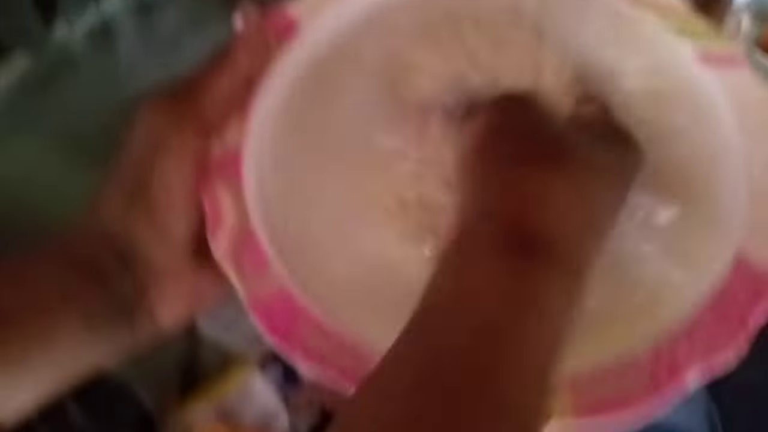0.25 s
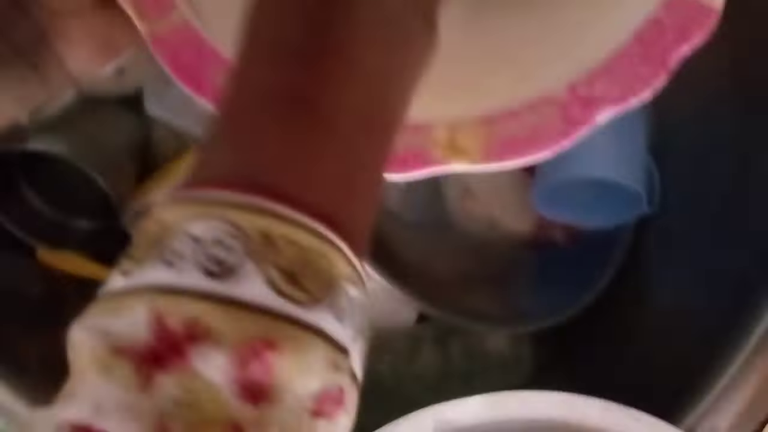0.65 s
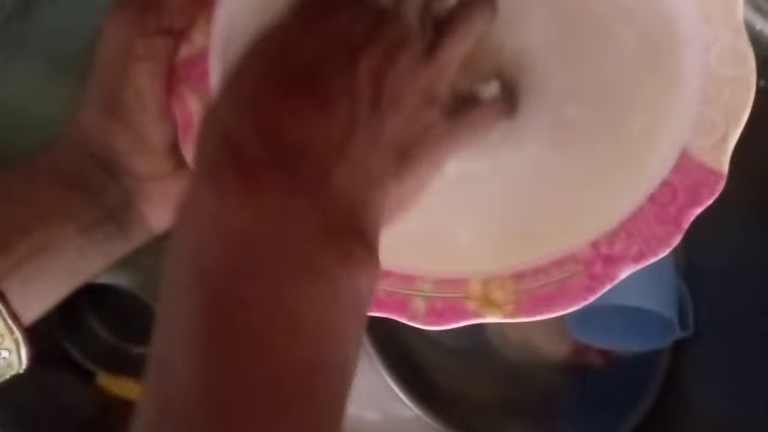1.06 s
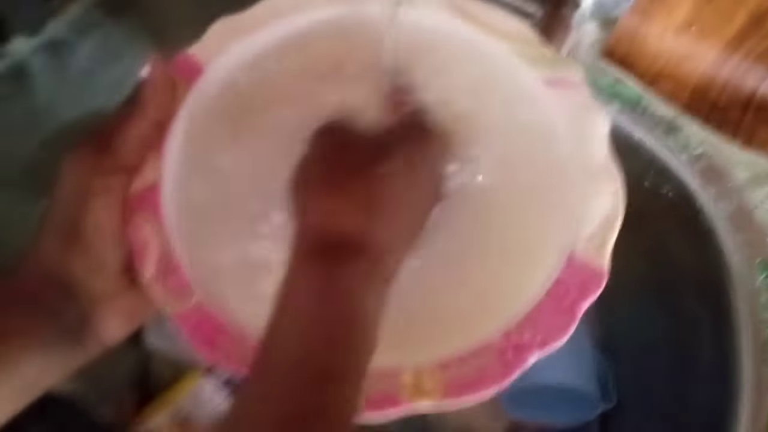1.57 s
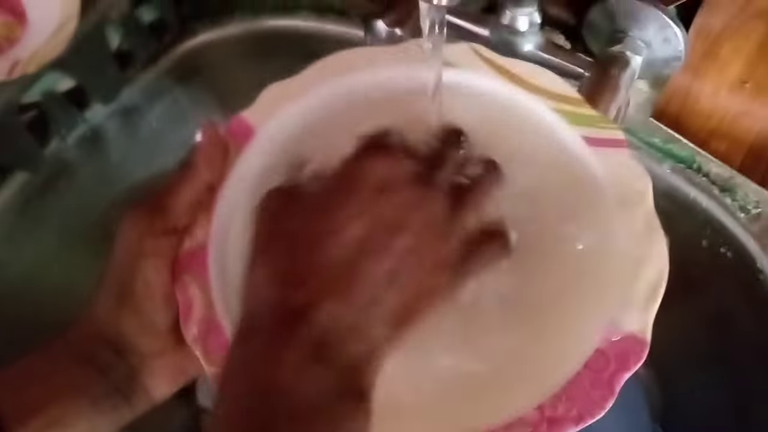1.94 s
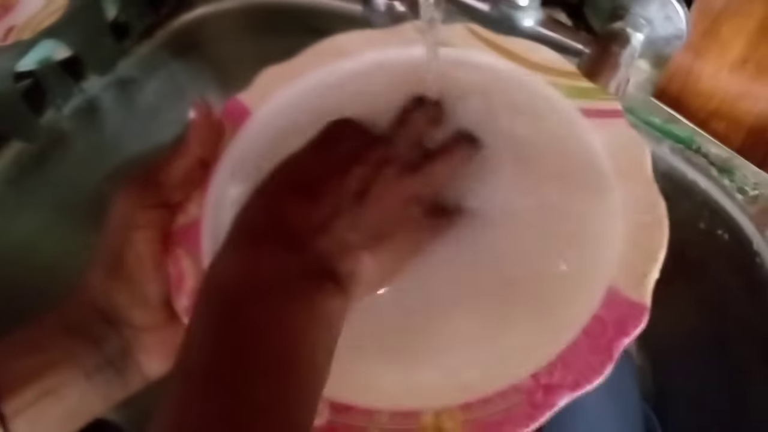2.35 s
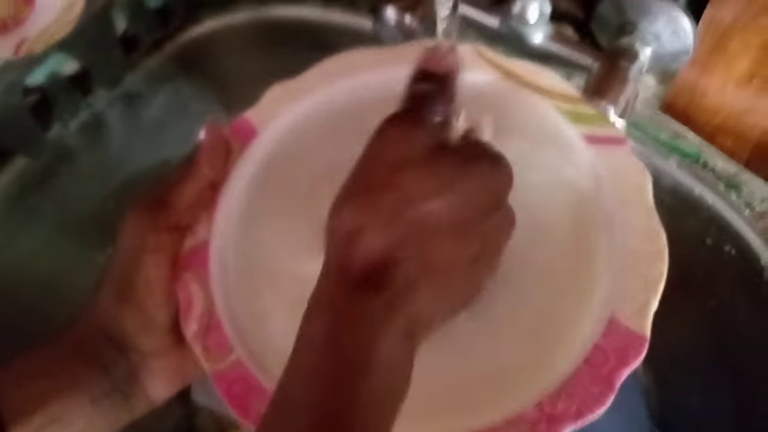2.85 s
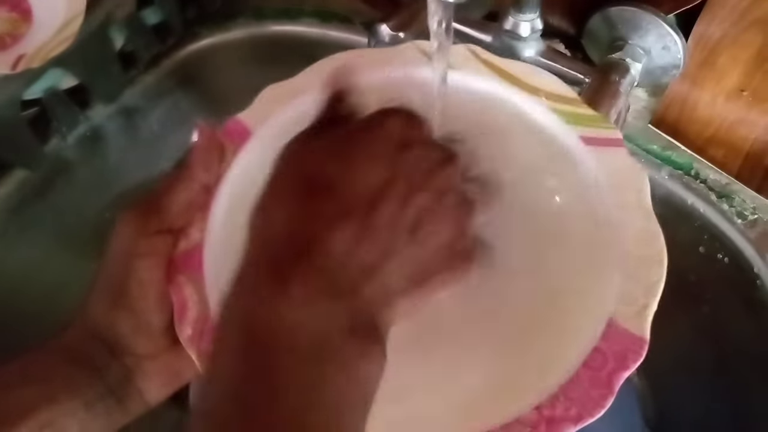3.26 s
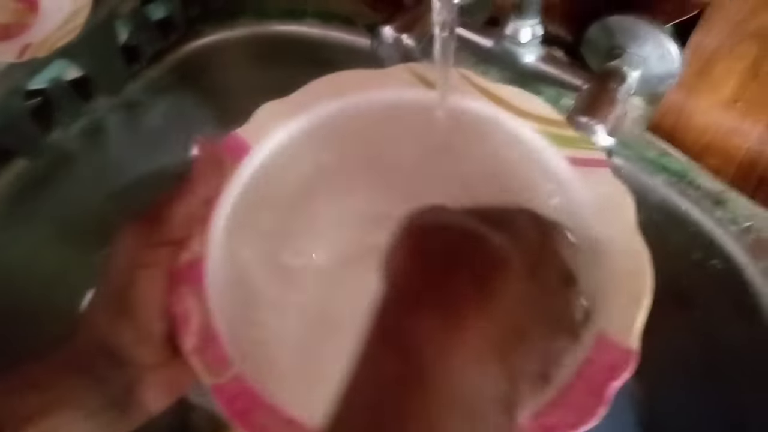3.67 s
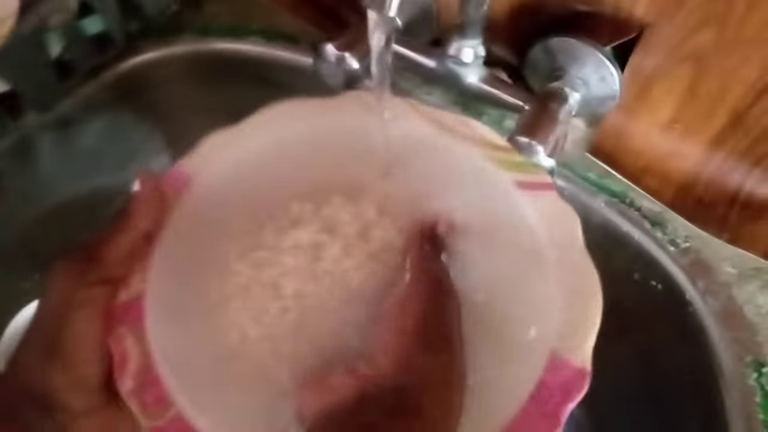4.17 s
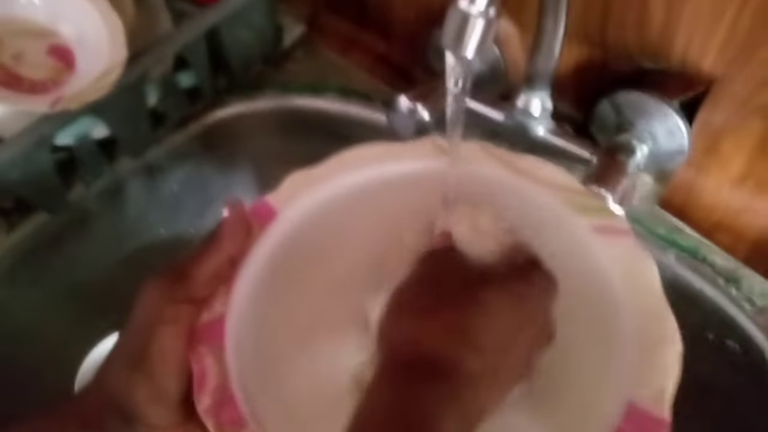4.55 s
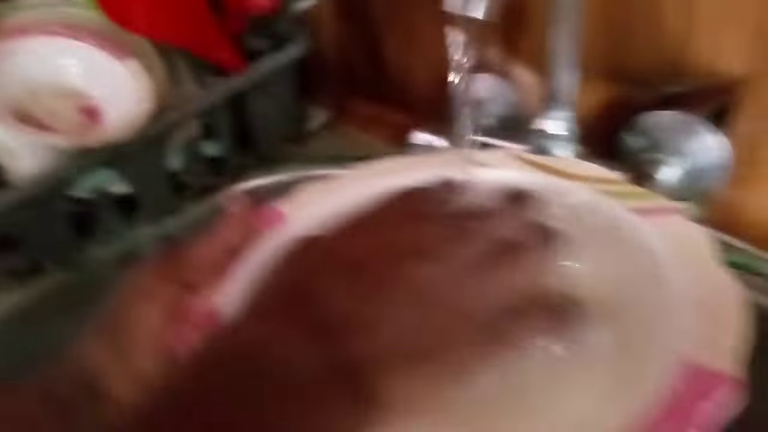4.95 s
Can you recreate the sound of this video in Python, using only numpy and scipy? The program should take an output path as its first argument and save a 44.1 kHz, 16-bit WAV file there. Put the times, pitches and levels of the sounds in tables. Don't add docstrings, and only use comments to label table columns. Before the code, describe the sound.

A hand swishes rice in a bowl of water under a trickling tap, with bubbly splashes, rough grain scrapes and one sharp loud tick.

```python
import sys
import numpy as np
from scipy import signal
from scipy.fft import rfft, irfft, next_fast_len
from scipy.io import wavfile
from scipy.ndimage import uniform_filter1d, map_coordinates

SR = 44100
rng = np.random.default_rng(int(sys.argv[2]) if len(sys.argv) > 2 else 0)


def dump(signal):
    limited = np.clip(np.atleast_2d(signal).T, -1, 1)
    pcm = np.round(limited * 32767).astype(np.int16)
    wavfile.write(sys.argv[1], SR, pcm)


def gain_from_db(level_db):
    decades = np.asarray(level_db, float) / 20
    return 10 ** decades


N = 229792

# (frequency [Hz], density [dB])
ROOM_SPECTRUM = [(25, -12), (138, 0.5), (264, -15), (534, -12), (1270, -17.5), (1810, -7.5), (2940, -29.5),
                 (3650, -20), (4660, -39), (7190, -13.5), (10800, -16.5), (16200, -54)]
# (frequency [Hz], level [dB rms])
HUM_LINES = [(50, -87), (101, -74), (150, -70), (200, -76)]
# (frequency [Hz], width [Hz], level [dB])
VESSEL_MODES = [(606, 180, -4.5), (2124, 81, -1.5)]
# (start [s], hold [s], level [dB])
OVERFLOWS = [
    (0.44, 0.063, -51.5),
    (0.6, 0.29, -55),
]
# (frequency [Hz], density [dB])
RATTLE_SPECTRUM = [(250, -21), (420, -11), (520, 0), (900, 0), (1300, 1.5), (1950, -6.5), (3300, -120)]
# (frequency [Hz], density [dB])
BEND_SPECTRUM = [(120, -82), (190, -9.5), (235, -8.5), (263, -2.5), (300, -13.5), (400, -35)]
# (start [s], hold [s], rattle [dB], bending over rattle [dB])
DRAGS = [(0.324, 0.1, -59, -4), (1.795, 0.074, -55, -10), (1.967, 0.012, -50.5, -9), (2.62, 0.082, -62, -3),
         (1.49, 0.12, -62, -9), (3.043, 0.012, -45, -10), (3.119, 0.12, -53.5, -17),
         (3.279, 0.035, -59, -1), (3.797, 0.23, -60, -9), (4.094, 0.035, -53, -23),
         (4.396, 0.065, -39.5, -6), (4.459, 0.098, -48, -7), (4.736, 0.14, -49.5, -11)]
# (time [s], peak [dB])
FILM_SNAPS = [(0.1365, -33), (0.629, -32), (0.743, -25.5), (0.809, -26.5), (1.24, -41), (1.654, -30),
              (1.6928, -31), (2.113, -40), (4.788, -29), (1.872, -25.5), (1.9447, -28.5), (2.023, -33),
              (2.4584, -28), (2.7063, -29.5), (2.69, -31), (2.735, -32), (2.79, -31), (2.808, -35),
              (2.922, -32), (2.98, -29), (3.04, -34), (3.0942, -31), (3.157, -25.5), (3.285, -27),
              (3.969, -36), (4.4276, -22.5), (4.518, -33), (4.738, -20.5), (4.7942, -17.5), (4.9232, -30.5),
              (5.143, -31), (5.126, -40), (1.7105, -32), (1.758, -35), (1.838, -30)]
# (frequency [Hz], density [dB])
TEAR_SPECTRUM = [(300, -57), (600, -23), (1500, -18), (3000, -7), (4500, -15), (6200, -3), (10000, -3),
                 (13500, -20.5), (16200, -28)]
# (time [s], peak [dB], pitch [Hz])
BLIPS = [(0.0208, -41, 2030), (0.1072, -40.5, 2411), (0.292, -43, 3617), (0.3263, -30.5, 4160),
         (0.467, -38.5, 3130), (0.4687, -49, 2067), (0.5032, -44, 2050), (0.56, -43, 3220),
         (0.6105, -36, 2510), (0.6994, -34, 3703), (0.7293, -33, 2411), (0.7403, -31, 3330),
         (0.756, -44, 2497), (0.7847, -39.4, 3430), (0.8192, -43, 3650), (0.8267, -39.5, 1900),
         (0.8633, -34.5, 3200), (0.9007, -39, 2080), (0.946, -44.0, 3480), (1.242, -41, 2860),
         (1.6887, -38.5, 1515), (1.728, -41, 2750), (1.879, -42, 2153), (2.447, -37, 1720),
         (2.528, -44, 3030), (2.6138, -42, 2370), (2.6529, -39, 1590), (2.734, -28.5, 4230),
         (2.738, -25, 3120), (2.768, -34.5, 1636), (2.7914, -35, 4180), (2.8148, -38, 1830),
         (2.8612, -45, 3445), (2.8881, -44, 2790), (2.924, -41, 1981), (2.9465, -37, 3600),
         (2.9668, -45.0, 1560), (1.612, -42, 2400), (3.009, -37, 2800), (3.158, -32, 2940),
         (3.219, -35, 2200), (3.2793, -40, 2153), (3.304, -46, 3962), (3.3442, -35, 2497),
         (3.368, -35, 1630), (3.474, -44, 1710), (3.97, -42.9, 4360), (4.2004, -45, 3617),
         (4.2882, -39, 4190), (4.357, -39.5, 2870), (4.6354, -42, 1880), (4.452, -39, 990),
         (4.8647, -42, 1150), (4.8812, -37, 1450), (4.957, -37, 1400), (5, -36, 1840), (5.0915, -39, 2970),
         (5.1262, -35, 1950), (5.1486, -38, 2430), (5.148, -35, 3660)]
# (time [s], peak [dB], pitch [Hz])
MORE_BLIPS = [(0.021, -42, 1650), (0.1372, -38.5, 1530), (0.1378, -40, 3320), (0.143, -44, 2700),
              (0.6794, -40, 3445), (0.327, -33, 1950), (0.7395, -38, 1460), (0.7511, -39, 2520),
              (0.8153, -39, 2800), (0.9176, -43.8, 2570), (0.923, -45, 3740), (0.9778, -33.5, 2600),
              (1.0112, -44, 2020), (1.649, -38.5, 1670), (1.6963, -27.5, 3650), (1.7084, -39, 2583),
              (1.738, -40, 2300), (1.738, -38.5, 2153), (1.757, -32, 1600), (1.7826, -43, 3703),
              (1.7996, -41, 1636), (1.8146, -37, 2110), (1.8622, -36, 3750), (1.8796, -36, 3430),
              (1.89, -34, 3600), (1.925, -36, 2560), (1.9315, -41, 3650), (1.9502, -32.5, 3460),
              (1.97, -35, 1650), (1.9762, -38.6, 2550), (2.0218, -31, 1730), (2.1166, -34, 3610),
              (2.4647, -37, 2220), (2.679, -34, 3040), (2.7038, -36, 2180), (2.733, -39, 1722),
              (2.7836, -39, 3445), (2.8188, -40, 2360), (4.739, -38, 2000), (4.753, -33, 2000),
              (2.9407, -37, 1716), (0.297, -43, 1120), (3.1383, -33, 3600), (3.1845, -33.5, 2340),
              (3.27, -41, 1620), (1.786, -38, 2300), (4.5354, -40, 1710), (1.339, -36.5, 1480),
              (4.6635, -45, 3703), (5.1245, -45, 1378)]
# (time [s], peak [dB], pitch [Hz])
TICKS = [(0.2192, -29.5, 6170), (0.2531, -47, 6201), (0.3367, -33, 6718), (0.3573, -41, 6150),
         (0.466, -37.5, 5900), (0.5708, -36.5, 6201), (0.6318, -36, 9991), (0.6965, -30.5, 7100),
         (0.7433, -33.6, 11000), (0.7693, -31, 6201), (0.8113, -37, 7579), (0.897, -33, 5770),
         (1.6563, -35, 11000), (1.7049, -38, 8957), (1.7249, -36, 9646), (1.8796, -30, 6000),
         (1.9954, -35, 7407), (2.1136, -36.5, 7600), (2.6505, -29, 6460), (2.7903, -40, 11300),
         (2.8688, -35, 5720), (2.95, -27.5, 6600), (3.0419, -30.5, 10500), (3.0981, -39, 7924),
         (3.4052, -42, 6170), (4.2862, -31, 6546), (4.3148, -40.4, 6400), (4.3844, -36.5, 6718),
         (4.405, -32, 6201), (4.43, -31, 7000), (4.5225, -35, 8957), (4.6414, -44, 6170),
         (4.7086, -40, 6300), (4.757, -24, 11025), (4.8476, -37, 6400), (4.9265, -34, 8300)]
# (time [s], peak [dB], pitch [Hz])
MORE_TICKS = [(0.2477, -38, 6201), (0.3515, -41, 10680), (0.3577, -36.9, 6201), (0.5912, -36.8, 6201),
              (0.646, -41, 6373), (2.957, -31, 5870), (0.9371, -38, 6029), (1.2419, -36, 9819),
              (1.6939, -33, 6250), (1.7589, -31, 5340), (1.9436, -29, 10508), (2.456, -34, 6300),
              (5.199, -35.5, 7300), (3.072, -34, 6890), (3.1008, -33, 6029), (3.1771, -35, 10500),
              (4.1704, -37, 7000), (4.2295, -38.5, 11400), (4.2665, -37.5, 6600), (5.141, -27, 6030),
              (4.8015, -25, 6718), (4.8314, -33.6, 9302), (5.18, -35, 7000), (4.848, -31, 9474),
              (4.94, -41, 9646), (5.1517, -31, 9646)]
# (time [s], peak [dB], pitch [Hz], life [s], breadth [0-1])
PLOPS = [(0.652, -32.5, 1320, 0.039, 0.07), (0.702, -33.5, 1157, 0.091, 0.18),
         (1.051, -41, 1424, 0.036, 0.23), (1.254, -51, 1030, 0.08, 0.13), (1.839, -36, 1116, 0.047, 0.03),
         (1.97, -32.5, 837, 0.076, 0.25), (2.623, -50, 787, 0.18, 0.07), (2.924, -40.5, 1083, 0.13, 0.1),
         (3.04, -30.5, 602, 0.019, 0.19), (3.187, -41.5, 669, 0.075, 0.05),
         (3.332, -29.5, 1107, 0.093, 0.02), (3.565, -46.5, 1090, 0.06, 0.1), (3.586, -40, 1374, 0.051, 0),
         (4.093, -46, 817, 0.1, 0.4), (4.395, -34.5, 628, 0.05, 0.67), (4.399, -31.5, 1040, 0.04, 0.4),
         (0.002, -57, 403, 0.36, 0.3), (4.4275, -30.5, 897, 0.035, 0.22), (4.555, -45, 1010, 0.05, 0.1),
         (4.511, -40, 748, 0.09, 0.1), (4.803, -29.5, 1470, 0.042, 0.01), (0.743, -39.5, 1064, 0.047, 0),
         (0.898, -37, 1520, 0.05, 0.18), (3.435, -47, 1110, 0.082, 0), (4.737, -42, 1330, 0.034, 0.02),
         (4.757, -42.5, 966, 0.15, 0), (5.128, -41.5, 1420, 0.035, 0.2)]
# (time [s], peak [dB], pitch [Hz])
CLEAR_BUBBLES = [(0.137, -30, 2230), (0.3256, -27.5, 1474), (0.3537, -15.5, 3720), (0.741, -25, 3440),
                 (0.893, -38, 2620), (0.9665, -33, 2110), (1.2421, -38.5, 2160), (1.674, -30, 3100),
                 (1.725, -27.5, 3820), (1.7565, -33, 2040), (1.907, -27.5, 2580), (1.9584, -27, 2220),
                 (2.005, -31, 3270), (2.216, -42, 2570), (2.77, -26, 2380), (2.8602, -28, 2040),
                 (3.041, -29.5, 2630), (3.088, -25.5, 4550), (3.1865, -27, 3010), (3.3048, -32.5, 1710),
                 (3.328, -26, 1880), (3.502, -39.5, 3840), (3.937, -34, 1760), (4.1684, -31, 2190),
                 (4.2672, -33.5, 2190), (5.184, -16.5, 2386), (2.789, -26.5, 5120), (5.059, -28, 1790),
                 (5.1246, -25, 3095), (4.659, -36, 3890), (2.1146, -25, 3070), (3.1317, -32.5, 1820),
                 (1.3375, -38, 2930), (1.351, -37.5, 3100), (2.212, -37.5, 2850), (2.221, -36.5, 1870),
                 (2.311, -45, 3430), (3.513, -44, 2800), (3.602, -42, 2220), (0.275, -41.5, 1460),
                 (1.038, -39, 1410)]
# (time [s], peak [dB], middle pitch [Hz])
SPLATS = [(0.3047, -38, 1370), (0.3385, -24.5, 2380), (0.632, -34, 3570), (0.64, -26, 2890),
          (0.6999, -20, 1794), (0.809, -31.5, 1476), (1.338, -21.5, 2224), (1.654, -38, 3280),
          (1.693, -27.5, 3120), (2.792, -28, 1880), (1.8133, -27.5, 2570), (2.0236, -18.5, 3020),
          (2.1279, -30, 3430), (2.431, -29, 2790), (2.529, -32, 2910), (2.681, -23.5, 2040),
          (2.698, -21, 2810), (2.7084, -17, 3000), (2.7363, -33.5, 2000), (3.1193, -30, 3540),
          (3.158, -26, 1380), (3.218, -30.5, 1370), (3.247, -34.5, 1660), (3.3686, -28, 2970),
          (4.396, -36, 1390), (4.66, -30, 1496), (4.7521, -32, 2370), (4.899, -24.5, 2325),
          (4.93, -26.5, 1920), (1.72, -31, 1700)]
# (time [s], peak [dB], pitch [Hz])
DROPS = [(0.205, -32, 6540), (0.353, -18.5, 4340), (0.4278, -28.5, 8880), (0.741, -19, 8180),
         (1.242, -38.5, 10930), (1.336, -38, 6400), (1.6594, -27, 6900), (1.6746, -25.5, 6650),
         (1.82, -28.5, 6200), (1.839, -22.5, 7560), (1.947, -18.5, 5880), (2.4565, -29.5, 6270),
         (2.707, -23, 5600), (2.7525, -22.5, 5680), (2.775, -24, 8340), (3.088, -31, 5900),
         (3.158, -30, 6140), (3.2855, -6, 6000), (3.7863, -34.5, 5500), (4.426, -24, 9250),
         (4.523, -25.5, 5900), (4.5478, -24, 5600), (4.7385, -12, 6460), (4.7505, -29, 6330),
         (4.7581, -18, 6960), (4.793, -35, 6600), (4.822, -23, 6160), (4.896, -27.5, 5820),
         (4.94, -28.5, 5320), (4.9952, -30.5, 6470), (5.147, -16.5, 6720)]
# (start [s], hold [s], bubbling [dB], spray over bubbling [dB])
STROKES = [(0.0, 0.039, -42, -6), (0.135, 0.0061, -43.5, 4.5), (0.207, 0.052, -46.5, 2.5),
           (0.297, 0.12, -46, 2.5), (0.41, 0.14, -50, -2), (0.58, 0.14, -44, 0.5),
           (0.732, 0.11, -40.5, -1.5), (0.886, 0.039, -39, -0.5), (0.976, 0.022, -51, 2),
           (1.657, 0.14, -44, -0.5), (1.799, 0.19, -43.5, 2), (2.024, 0.006, -35.5, -1),
           (2.218, 0.043, -49, -8), (2.43, 0.058, -47.5, -2.5), (2.582, 0.1, -47.5, -2.5),
           (2.692, 0.11, -40.5, 2), (2.865, 0.14, -43.5, 1), (3.038, 0.15, -41, 0),
           (3.216, 0.094, -48.5, 0), (3.317, 0.075, -40, -2.5), (3.782, 0.073, -49.5, 4),
           (3.907, 0.039, -57.5, 8.5), (4.282, 0.16, -54, 5), (4.427, 0.02, -44.5, 12),
           (4.521, 0.055, -47, 5), (4.632, 0.17, -48, 4), (4.744, 0.034, -38.5, 7.5), (4.8, 0.025, -41, 5),
           (4.842, 0.11, -44, 2.5), (5.131, 0.021, -45, 3.5)]
# (frequency [Hz], density [dB])
FROTH_SPECTRUM = [(470, -48), (800, -13.5), (1700, -3), (2450, 0.5), (3040, -1.5), (3600, -1.5),
                  (4390, -16.5), (5000, -9), (6500, -22), (11000, -120)]
# (frequency [Hz], density [dB])
SPRAY_SPECTRUM = [(2350, -28.5), (4000, -6.5), (4420, -15.5), (5720, 2), (6580, 4.5), (7790, -3.5),
                  (9180, -1.5), (10700, -7), (13500, -21.5), (15800, -22)]


def unit(x):
    return x / np.sqrt(np.mean(x ** 2) + 1e-20)


def wobble(rate):
    knots = rng.standard_normal(int(N * rate / SR) + 4)
    return map_coordinates(knots, [np.arange(N) * rate / SR])


def coloured(x, spectrum, flatten=True):
    m = next_fast_len(N + 8192)
    hz, db = np.transpose(spectrum)
    z = rfft(x, m)
    own = 1
    if flatten:
        own = np.sqrt(np.abs(uniform_filter1d(np.abs(z) ** 2, size=m // 60))) + 1e-9
    gain = gain_from_db(np.interp(np.log(np.fft.rfftfreq(m, 1 / SR) + 1), np.log(hz), db))
    return unit(irfft(z / own * gain, m)[:N])


def patchy(depth_db):
    z = signal.stft(rng.standard_normal(N), nperseg=256)[2]
    field = uniform_filter1d(rng.standard_normal(z.shape), size=9, axis=0)
    field = uniform_filter1d(field, size=5, axis=1)
    return signal.istft(z * gain_from_db(depth_db * unit(field)), nperseg=256)[1][:N]


def echoes(near_db, near_t60, far_db, far_t60):
    t = np.arange(SR // 6) / SR
    tail = gain_from_db(near_db - 60 * t / near_t60) + gain_from_db(far_db - 60 * t / far_t60)
    h = tail * rng.standard_normal(len(t)) * np.clip(t / 0.0026, 0, 1)
    h[0] = 1
    return h


def smeared(x, **room):
    out, step = np.zeros(N + SR), SR // 25
    for i in range(0, N, step):
        part = signal.fftconvolve(x[i:i + step], echoes(**room))
        out[i:i + len(part)] += part
    return out[:N]


def grains(count, centre_hz, octaves, cycles, spread_db, rise):
    draw = rng.random((count, 3))
    hz = centre_hz * 2 ** (octaves * rng.standard_normal(count))
    hz = np.clip(hz, 150, 16000)[:, None]
    t = np.arange(1900000 // count) / SR
    age = t * hz / cycles
    size = gain_from_db(-spread_db * np.log(draw[:, 1:2] + 0.044))
    ring = np.sin(2 * np.pi * hz * t * (1 + rise * np.minimum(age, 1)))
    wave = size * ring * np.exp(-4 * age) * (1 - np.exp(-t * hz * 3))
    at = (draw[:, :1] * N).astype(int) + np.arange(len(t))
    return unit(np.bincount(at.ravel(), wave.ravel(), N + len(t))[:N])


def sized(table, life_s, breadth):
    return [(*row, life_s, breadth) for row in table]


def pops(table, gain_db, attack_cycles, rise, room):
    out, t = np.zeros(N + SR), np.arange(SR // 11) / SR
    for s, db, hz, life, breadth in table:
        life = max(life, 0.003)
        octaves = np.clip(breadth, 0, 1) * rng.uniform(0.27, 1.0, 3) * [0, 1, -1]
        delay = 0.1504 * life * rng.random(3) * [0, 1, 1]
        u = np.clip(t - delay[:, None], 0, None)
        climb = 1 + rise * (np.minimum(u / life, 1) - 0.3)
        rings = np.sin(2 * np.pi * hz * 2 ** octaves[:, None] * u * climb)
        rings = rings * gain_from_db(-60 * u / life) * (1 - np.exp(-(u * hz / attack_cycles) ** 2))
        heard = signal.fftconvolve(np.dot([1, 0.6, 0.45], rings), echoes(**room))
        out[round(s * SR):][:len(heard)] += gain_from_db(db + gain_db) * heard / np.abs(heard).max()
    return out[:N]


def swells(rows, attack_s, t60):
    s, hold, db = (c[:, None] for c in np.transpose(rows)[:3])
    t = np.arange(0, N + 64, 64) / SR - s
    fall_db = 60 * np.clip(t - hold, 0, None) / t60
    return (gain_from_db(db - fall_db) * np.clip(t / attack_s + 1, 0, 1)) ** 2


def summed(power, rest_db, extra_db=0):
    weights = gain_from_db(2 * np.reshape(extra_db, (-1, 1)))
    total = np.sqrt((power * weights).sum(0) + gain_from_db(2 * rest_db))
    return np.interp(np.arange(N), np.arange(len(total)) * 64, total)


def stroke_swells():
    return swells(STROKES, attack_s=0.011, t60=0.19)


def water_gains():
    strokes = stroke_swells()
    return summed(strokes, -55), summed(strokes, -53, np.transpose(STROKES)[3])


def kitchen():
    out = coloured(rng.standard_normal(N), ROOM_SPECTRUM) * gain_from_db(-61.5 + 1.8 * wobble(2.514))
    t = np.arange(N) / SR
    for hz, db in HUM_LINES:
        sway = gain_from_db(db + 3.5 + 2.6 * wobble(8.7))
        out += sway * np.sin(2 * np.pi * hz * t + 0.81 * wobble(14))
    return out


def spill():
    m = next_fast_len(N + 8192)
    f = np.fft.rfftfreq(m, 1 / SR)
    hollow = 0
    for centre, width, db in VESSEL_MODES:
        band = 1j * f * width / (centre * centre - f * f + 1j * f * width)
        hollow = hollow + gain_from_db(db) * band ** 2 / np.sqrt(width)
    drumming = rng.standard_normal(N) * gain_from_db(1.4 * wobble(25.2))
    ring = unit(irfft(rfft(drumming, m) * hollow, m)[:N])
    return summed(swells(OVERFLOWS, attack_s=0.037, t60=0.71), -120) * ring


def bowl():
    strokes, drags = stroke_swells(), swells(DRAGS, attack_s=0.0034, t60=0.15)
    rattle = np.hypot(summed(drags, -67.5), summed(strokes, -120, -33))
    wall = np.hypot(summed(drags, -74, np.transpose(DRAGS)[3]), summed(strokes, -120, -42))
    lumps = grains(count=8000, centre_hz=840, octaves=1.0, cycles=1.73, spread_db=1.5, rise=0.34)
    lumps = (lumps + 1.74 * rng.standard_normal(N)) * gain_from_db(1.1 * wobble(40))
    bend = gain_from_db(-0.7) * wall * coloured(rng.standard_normal(N), BEND_SPECTRUM, flatten=False)
    return bend + gain_from_db(-3.0) * rattle * coloured(lumps, RATTLE_SPECTRUM)


def crackle():
    draw = rng.random((2, 2, N))
    struck = draw[0] < 900 / SR
    knocks = struck * gain_from_db(-3.2 * np.log(draw[1] + 0.03)) * np.sign(draw[1, ::-1] - 0.5)
    bubbling, spray = water_gains()
    dull = gain_from_db(-14.0) * bubbling * coloured(knocks[0], FROTH_SPECTRUM, flatten=False)
    bright = gain_from_db(-11.5) * spray * coloured(knocks[1], SPRAY_SPECTRUM, flatten=False)
    return dull + bright


def snaps():
    burst, t = np.zeros(N + SR), np.arange(SR // 8) / SR
    fade = gain_from_db(-60 * t / 0.032) + gain_from_db(-1.5 - 60 * t / 0.005)
    for s, db in FILM_SNAPS:
        burst[round(s * SR):][:len(t)] += gain_from_db(db) * fade * (1 - np.exp(-t / 0.001))
    puffs = burst[:N] * unit(patchy(depth_db=4.5))
    return gain_from_db(-4.0) * np.std(puffs) * coloured(puffs, TEAR_SPECTRUM, flatten=False)


def patter():
    blips = pops(sized([*BLIPS, *MORE_BLIPS], 0.019, 0.12), -2.7, attack_cycles=0.89, rise=0.032,
                 room=dict(near_db=-32.0, near_t60=0.033, far_db=-32.5, far_t60=0.2))
    ticks = pops(sized([*TICKS, *MORE_TICKS], 0.0071, 0.122), -2.3, attack_cycles=4.5, rise=0.037,
                 room=dict(near_db=-20.0, near_t60=0.04, far_db=-55.0, far_t60=0.27))
    return blips + ticks


def splashes():
    big = pops(PLOPS, -2.4, attack_cycles=0.97, rise=0.014,
               room=dict(near_db=-24.5, near_t60=0.024, far_db=-36.5, far_t60=0.095))
    mids = sized(CLEAR_BUBBLES, 0.01896, 0.076) + sized(SPLATS, 0.02094, 0.385)
    mid = pops(mids, -5.0, attack_cycles=1.27, rise=0.041,
               room=dict(near_db=-24.5, near_t60=0.05, far_db=-37.0, far_t60=0.21))
    small = pops(sized(DROPS, 0.00572, 0.09), -0.85, attack_cycles=2.85, rise=0.045,
                 room=dict(near_db=-20.5, near_t60=0.04, far_db=-46.0, far_t60=0.43))
    return big + mid + small


def stirring():
    bubbling, spray = water_gains()
    clump = wobble(20.94)
    room = dict(near_db=-13.0, near_t60=0.032, far_db=-38.5, far_t60=0.34)
    froth = grains(count=6000, centre_hz=1870, octaves=0.9, cycles=7.1, spread_db=3.5, rise=0.13)
    froth = froth + 0.54 * patchy(depth_db=5.0)
    fizz = grains(count=9000, centre_hz=6500, octaves=0.5, cycles=6.0, spread_db=5.5, rise=0.03)
    fizz = fizz + 0.5 * patchy(depth_db=2.5)
    froth = smeared(froth * gain_from_db(0.66 * clump + 1.74 * wobble(35)), **room)
    fizz = smeared(fizz * gain_from_db(1.3 * clump + 1.25 * wobble(40)), **room)
    froth = gain_from_db(-6.0) * bubbling * coloured(froth, FROTH_SPECTRUM)
    return froth + gain_from_db(-4.4) * spray * coloured(fizz, SPRAY_SPECTRUM)


def scene():
    behind = kitchen() + spill() + bowl() + crackle()
    water = snaps() + patter() + splashes() + stirring()
    return (behind + water)[None]


def roll_off(x):
    return signal.sosfilt(signal.butter(12, 16800, fs=SR, output="sos"), x)


def record(dry):
    hz = np.fft.rfftfreq(N, 1 / SR)
    low_cut_hz, top_hz = 46, 16000
    band = (hz < top_hz) / np.sqrt(1 + (low_cut_hz / (hz + 1)) ** 6)
    return roll_off(irfft(rfft(dry) * band, N))


dry = scene()
out = record(dry)
dump(out)
```